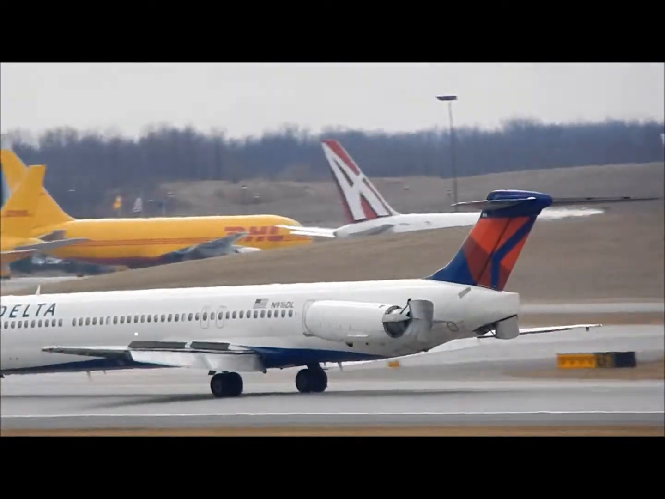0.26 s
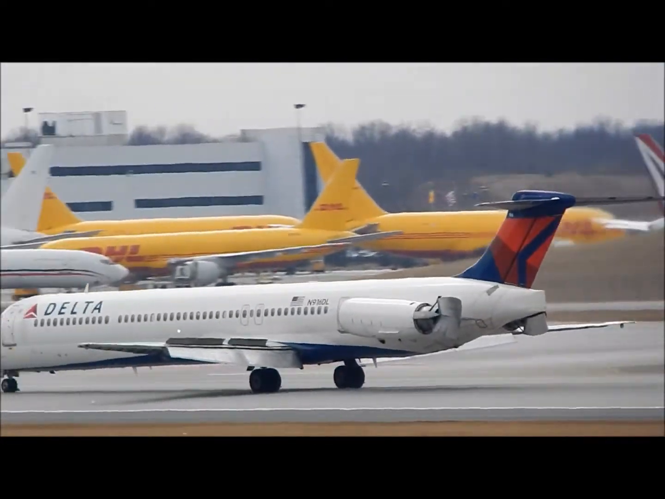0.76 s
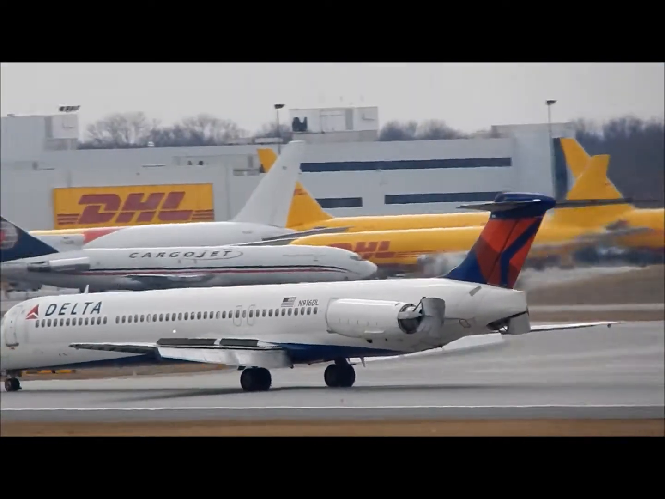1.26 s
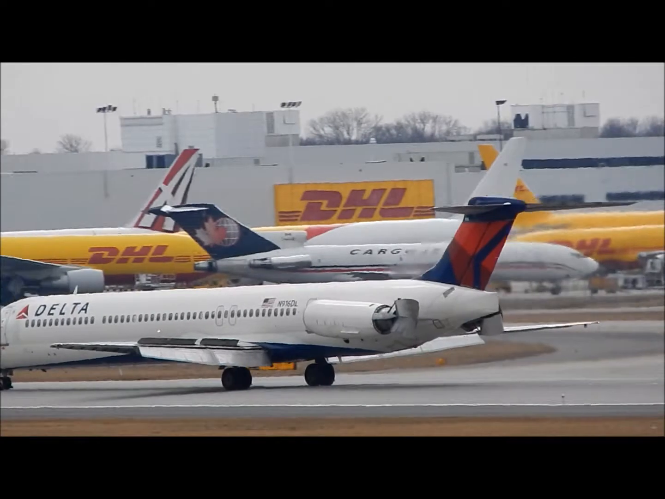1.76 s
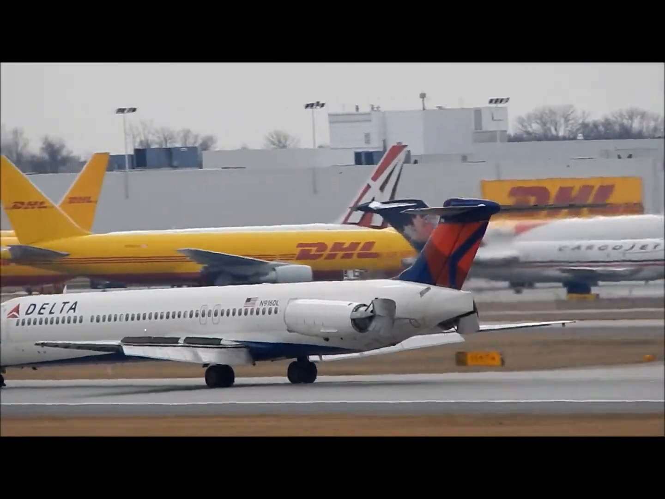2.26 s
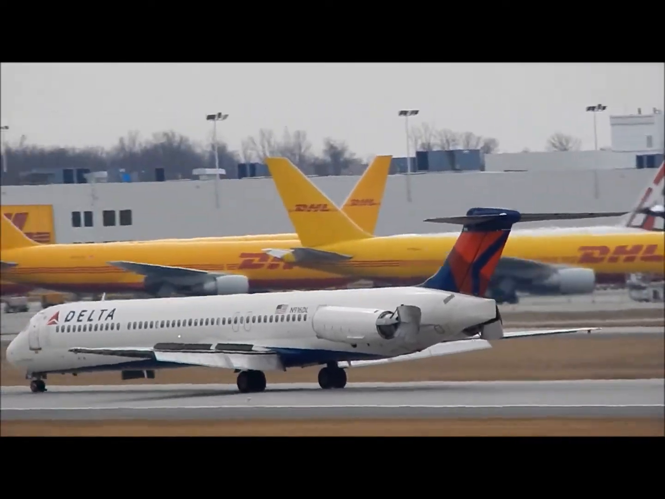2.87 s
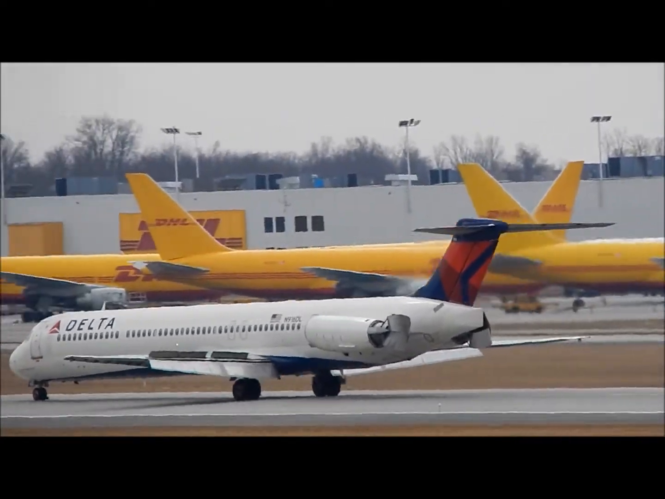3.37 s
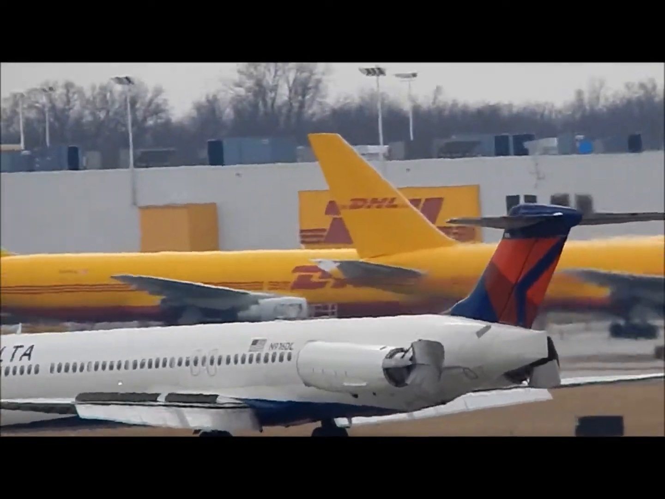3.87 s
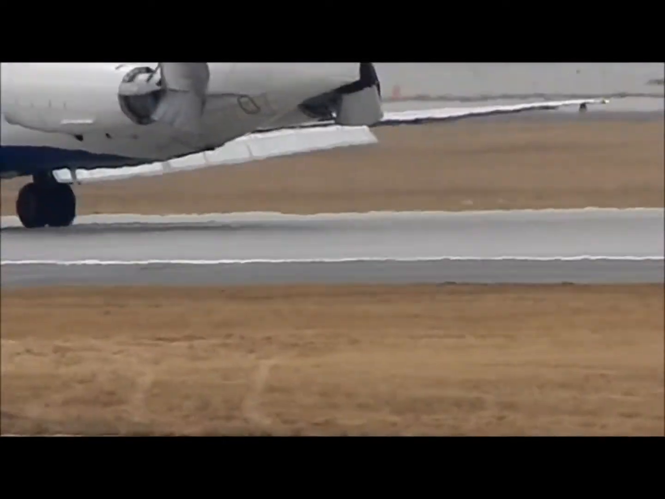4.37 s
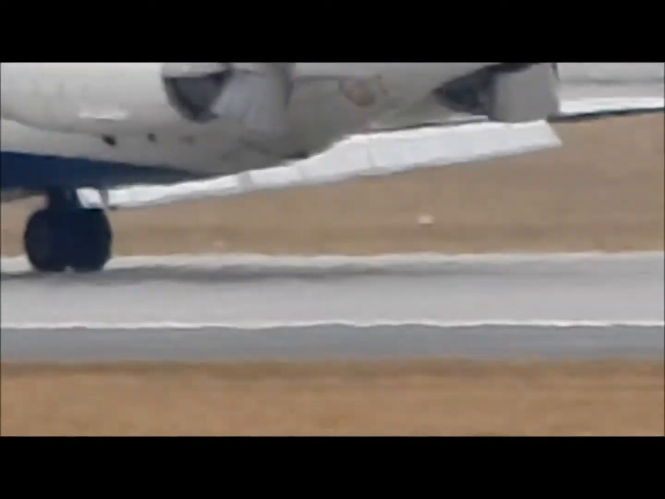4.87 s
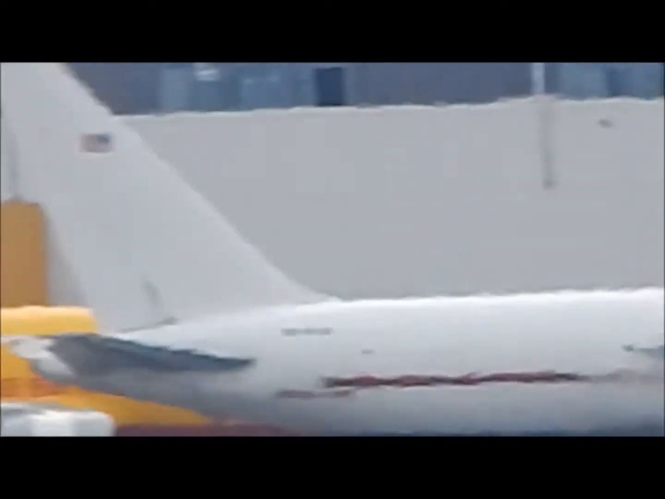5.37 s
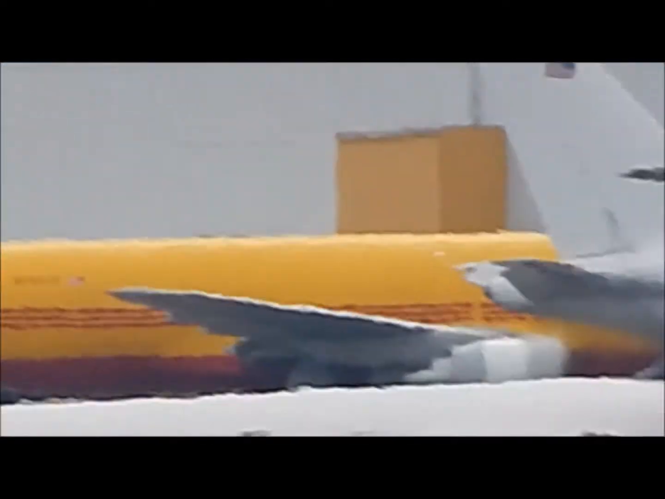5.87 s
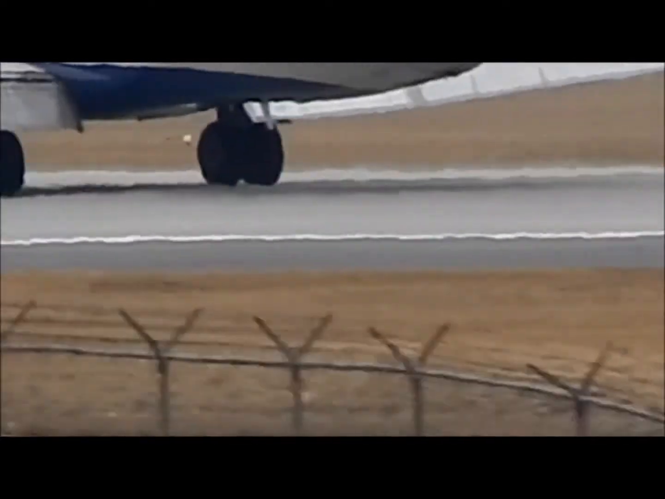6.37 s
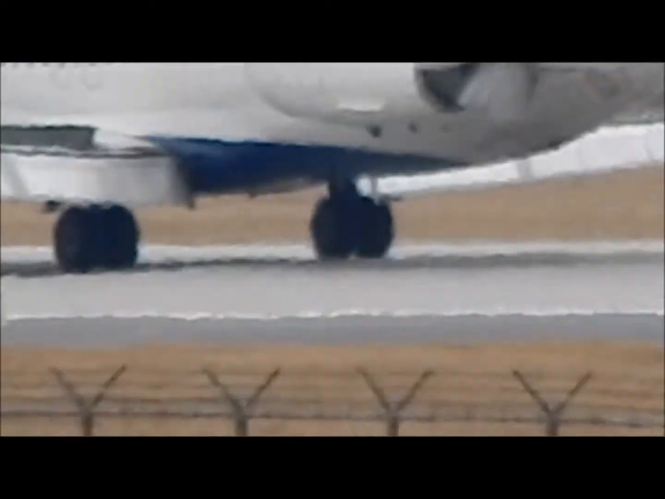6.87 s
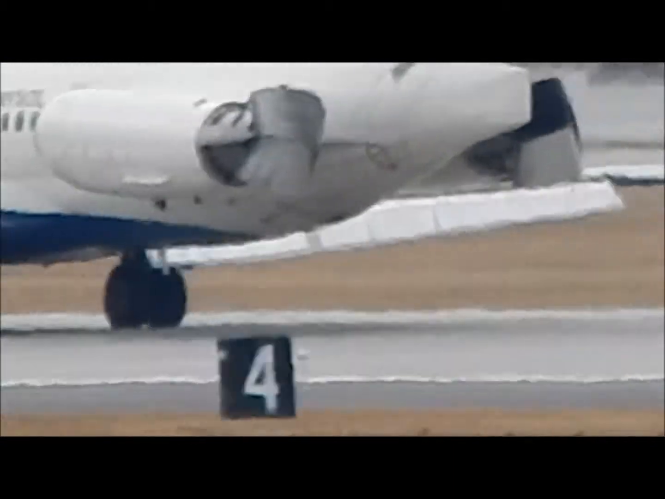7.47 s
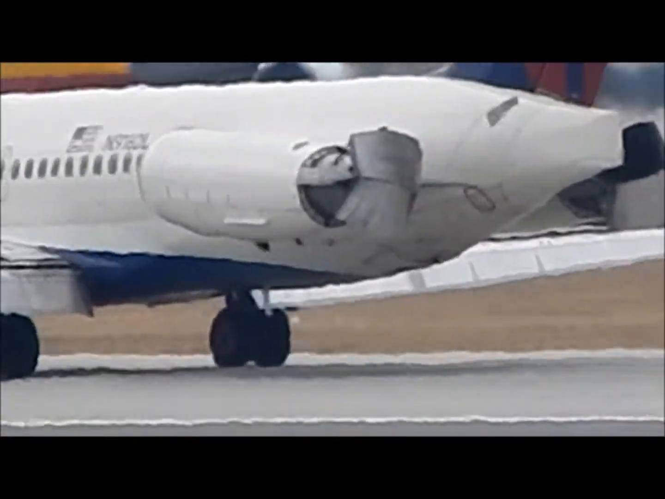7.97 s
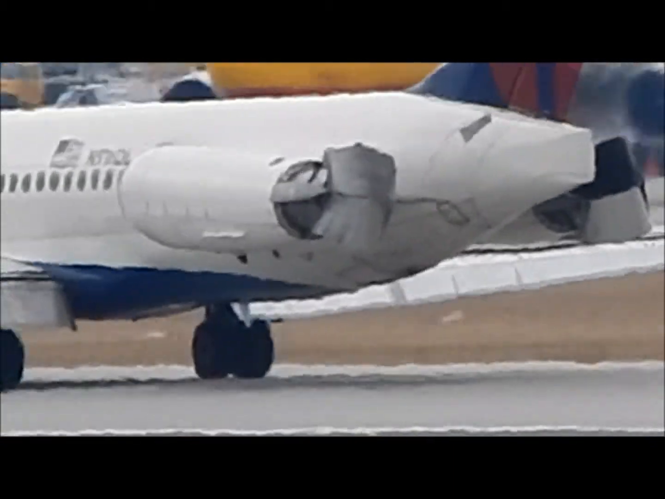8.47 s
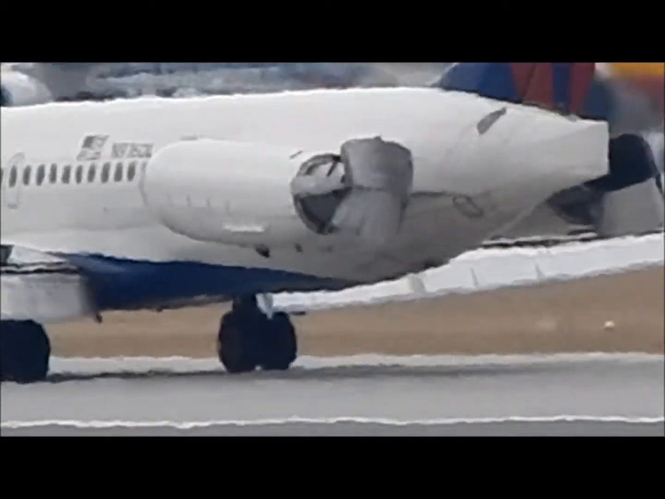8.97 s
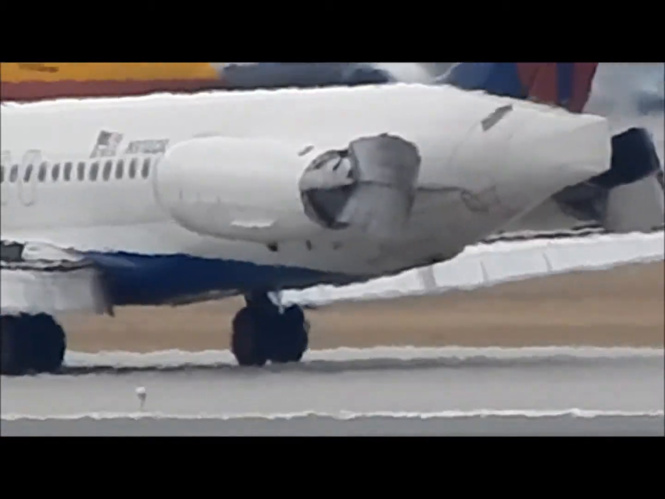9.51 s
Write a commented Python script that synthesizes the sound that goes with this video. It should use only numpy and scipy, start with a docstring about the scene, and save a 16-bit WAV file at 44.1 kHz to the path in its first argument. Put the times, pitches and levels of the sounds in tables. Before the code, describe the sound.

From the start, a twin rear-engined airliner rolls along a runway in reverse thrust, heard outdoors from beyond the fence. The roar is broad, low and continuous, with little treble and a slowly shifting hollow colour; it is strong for about 3 seconds, brightening near 1.2, then weaker from 3.3 to 5.3. Low wind thuds hit the microphone in abrupt, irregular bursts, densest until about 8.5, with hard buffets near 3.4 and 4.4 that make the level dip. Close, faint finger hiss and tiny ticks come and go. At 4.8 a scrape and sharp snap ring the camera case, slightly left, and the sound ducks for about half a second. The roar returns by 5.7 and holds. Breathy skin squeaks come around 7.1 to 7.3, a bright tick at 7.8. After 8.3 the engines fade, leaving weak rumble by 9.7, with little wind.

```python
"""An airliner with two rear engines rolls down a runway in reverse thrust, heard from beyond the fence.
Its roar is shaped noise in three bands, combed by a ground echo, dulled by air, fading as the engines spool down.
Gusts, abruptly gated low noise, buffet the microphone; hands on the camera rustle, squeak and tick in hiss bursts.
The gain control dips at the hardest gusts and ducks for half a second after one sharp click,
which is a noise crack with decaying case resonances."""
import sys
import numpy as np
from scipy import signal
from scipy.fft import rfft, irfft, next_fast_len
from scipy.io import wavfile
from scipy.ndimage import uniform_filter1d, minimum_filter1d, map_coordinates

SR = 44100
rng = np.random.default_rng(int(sys.argv[2]) if len(sys.argv) > 2 else 0)


def inscribe(sig):
    """Save sig as 16-bit PCM at rate SR to the path in sys.argv[1].

    A 1-D sig is mono; a 2-D sig holds one channel per row.
    Samples are clipped to [-1, 1] before scaling.
    """
    pcm = np.round(np.clip(np.atleast_2d(sig).T, -1, 1) * 32767)
    wavfile.write(sys.argv[1], SR, pcm.astype(np.int16))


N = 429521
TIME = np.arange(N) / SR
TOP_HZ = 15830  # upper band limit


def amp(db):
    """Level law: decibels to an amplitude ratio."""
    return 10 ** (np.asarray(db) / 20)


def unit(x):
    """Normalization: x at rms 1."""
    return x / np.sqrt(np.mean(x ** 2) + 1e-20)


def along(points, hz):
    """Logarithmic frequency scale: (Hz, value) points read between their knots."""
    f, v = np.transpose(points)
    return np.interp(np.log(hz + 1), np.log(f + 1), v)


def curves(rows):
    """Linear interpolation: one value per sample for each column after the time."""
    s, *columns = np.transpose(rows)
    return [np.interp(TIME, s, column) for column in columns]


def smooth(x, seconds):
    """Running mean of a positive quantity."""
    return np.abs(uniform_filter1d(x, max(1, int(seconds * SR))))


def wobble(rate):
    """Random modulation: a smooth curve through rate random knots a second."""
    knots = rng.standard_normal(int(N * rate / SR) + 4)
    return map_coordinates(knots, [TIME * rate])


def filtered(x, response):
    """Linear filtering: the spectrum of x times a response of frequency."""
    m = next_fast_len(N + 8192)
    hz = np.fft.rfftfreq(m, 1 / SR)
    return irfft(rfft(x, m) * response(hz), m)[..., :N]


def below(hz, edge_hz, order=10):
    """Low-pass gain, one half at the edge."""
    return 1 / (1 + (hz / edge_hz) ** order)


def panned(lr_db):
    """Interchannel level difference: gains that make left lr_db louder than right."""
    return amp(np.array([[lr_db], [-lr_db]]) / 2)


def rush(spectrum, alike):
    """Partial coherence: coloured stereo noise of rms 1, its channels correlated as alike tells."""
    def mid_and_side(hz):
        turn = np.arccos(np.clip(along(alike, hz), -1, 1)) / 2
        return amp(along(spectrum, hz)) * [np.cos(turn), np.sin(turn)]

    mid, side = filtered(rng.standard_normal((2, N)), mid_and_side)
    return unit(np.array([mid + side, mid - side]))


def add(track, s, sound):
    """Superposition: mix a short stereo sound in at time s."""
    part = track[:, round(s * SR):][:, :sound.shape[1]]
    part += sound[:, :part.shape[1]]


def tick(db, hz, decay_s):
    """Impulsive noise: a burst around hz under exponential decay, db rms at its peak."""
    t = TIME[:SR // 32]
    decay = np.exp(-t / decay_s)
    burst = decay * (rng.standard_normal(len(t)) + .5 * rng.standard_normal((2, len(t))))
    edges_hz = [hz * 2 / 3, min(hz * 3 / 2, TOP_HZ)]
    burst = signal.sosfilt(signal.butter(1, edges_hz, "band", fs=SR, output="sos"), burst)
    return amp(db) * unit(burst) * np.sqrt(np.mean(decay ** 2))


# Small ticks of the camera body.
# Each row: start in seconds, rms level at the peak in dB, left over right in dB, centre in Hz.
BODY_TICKS = [(0.8874, -46, 6, 9500), (0.8902, -44, 2, 3800), (0.9348, -49, 3, 8560),
              (1.0498, -43, -1, 3310), (1.3405, -43, 1.5, 3600), (1.5913, -46, 7, 9040),
              (1.8971, -46, 1.5, 8500), (3.1944, -41, -3, 5970), (3.204, -48, 3, 10900),
              (3.222, -50.5, 1, 9950), (3.7938, -51.5, 5, 9000), (3.8845, -51.5, 3, 10140),
              (4.0478, -45, 5.5, 9950), (4.6678, -44.5, 4, 9500), (4.7125, -38.5, 2.5, 6000),
              (7.295, -45, 1, 5020), (7.7675, -48, 5, 7930), (7.798, -35, 6, 12500),
              (7.882, -46.5, 4.5, 11000), (9.653, -48, -8, 3400)]


def ticks(decay_s=0.00095):
    """Sudden release of strain: the body gives under the fingers with sharp ticks, some dull, some bright."""
    sound = np.zeros((2, N))
    for s, db, lr_db, hz in BODY_TICKS:
        add(sound, s, tick(db, hz, decay_s) * panned(lr_db))
    return sound


# Skin catching on the case with a breathy squeak.
# Each row: centre in seconds, peak level in dB, half-width in seconds, pitch of the hiss in Hz.
SKIN_SQUEAKS = [(7.1, -65.5, 0.071, 5100), (7.12, -64, 0.08, 8300), (7.265, -58, 0.014, 4000),
                (8.125, -67.5, 0.022, 11200)]


def squeaks(width_hz=550):
    """Frictional noise through a resonance: a dragging fingertip makes a short swell of narrow hiss."""
    sound = np.zeros((2, N))
    for s, db, half_width_s, hz in SKIN_SQUEAKS:
        resonance = signal.iirpeak(hz, hz / width_hz, fs=SR)
        band = signal.lfilter(*resonance, rng.standard_normal((2, N)))
        sound += amp(db) * np.exp(-((TIME - s) / half_width_s) ** 2) * unit(band)
    return sound


# Spectrum of skin on the camera. Each row: frequency in Hz, relative density in dB per Hz.
SKIN_SPECTRUM = [(1000, -21.5), (3500, 7), (5500, 4), (7000, 1), (9000, 2.5), (11000, 4.5), (13500, -4),
                 (15800, -18)]
# Fingers sliding. Each row: centre in seconds, nominal hiss level in dB, half-width in seconds.
FINGER_SLIDES = [(.875, -59.5, 0.042), (1.3, -60.5, 0.11), (1.598, -57, 0.019), (2.95, -62.5, 0.44),
                 (3.188, -53, 0.025), (3.57, -61, .02), (3.87, -62, 0.074), (4.7, -56.5, 0.09),
                 (5.33, -67.5, 0.21), (7.3, -57.5, 0.033), (7.81, -55, 0.048), (8.1, -65.5, 0.79),
                 (9.5, -63, .04)]


def hands(rest_db=-66, grain_db=0.6, puff_db=-0.3, specks_per_s=16, speck_db=-3.02, speck_spread_db=4,
          speck_s=0.0023, sheen_db=-15, sheen_grows=1.5):
    """Sliding friction: a grainy hiss with tiny specks, louder and brighter whenever a finger slides."""
    # the resting hiss and overlapping slides add in power
    slide_power = np.ones(N)
    for s, db, half_width_s in FINGER_SLIDES:
        swell = np.exp(-((TIME - s) / half_width_s) ** 2)
        slide_power = slide_power + (amp(db - rest_db) * swell) ** 2
    slide = np.sqrt(slide_power)
    # specks fall at random, as in a Poisson process
    gaps, sizes = rng.exponential(size=(400, 2)).T
    at = np.minimum(np.cumsum(gaps) / specks_per_s * SR, N).astype(int)
    specks = np.bincount(at, amp(speck_db + speck_spread_db * np.minimum(sizes, 2)), N + 1)[:N]
    specks = smooth(specks, speck_s) * speck_s * SR
    grain = unit(amp(grain_db * wobble(210) + puff_db * wobble(25))) + specks
    hiss = slide * rush(SKIN_SPECTRUM, [(3000, 0.48), (12000, 0.089)])
    # the sheen grows faster than the slide, which brightens it
    bright = rush([(5000, -22.5), (12000, 0.5), (15000, -0.5), (17000, -39.0)], [(12000, .1)])
    sheen = amp(sheen_db) * slide ** sheen_grows * bright
    return amp(rest_db) * grain * panned(2) * (hiss + sheen)


# The click, a catch and then a snap. Each row: start in seconds, crack in dB, ring in dB, before panning.
CATCH_AND_SNAP = [(4.784, -21.5, -35), (4.7882, -15.5, -9)]
# Resonances of the camera case. Each row: frequency in Hz, relative level in dB, 60 dB decay in seconds.
CASE_MODES = [(2060, 0, .022), (2600, -10, .025), (3150, -13, .025), (3574, -19, .03), (4764, -27, .03),
              (5912, -28, .03), (7300, -21, .025), (8765, -24, .025)]
# Scrapes around the snap. Each row: centre in seconds, nominal level in dB, half-width in seconds.
PART_SCRAPES = [(4.776, -32, .010), (4.804, -26.5, .015)]


def click(chatter_db=-5, judder_db=1.5, crack_t60=.013):
    """Modal excitation: a part scrapes, catches and snaps home by the right port, ringing the case."""
    t = TIME[:SR // 8]
    ring = sum(amp(db - 60 * t / t60) * np.sin(2 * np.pi * hz * t) for hz, db, t60 in CASE_MODES)
    scrape = sum(amp(db) * np.exp(-((TIME - s) / width) ** 2) for s, db, width in PART_SCRAPES)
    force = scrape * unit(amp(judder_db * wobble(500)))
    # the scrape drives the same resonances with noise
    chatter = signal.fftconvolve(force * rng.standard_normal(N), ring / np.linalg.norm(ring))[:N]
    case = np.tile(amp(chatter_db) * chatter, (2, 1))
    force = np.tile(force, (2, 1))
    for s, crack_db, ring_db in CATCH_AND_SNAP:
        add(case, s, amp(ring_db) * ring[None])
        add(force, s, amp(crack_db - 60 * t / crack_t60)[None])
    crack = rush([(800, -28.0), (2100, 11.0), (3000, 2), (4500, -3.5), (7500, -0.5), (11000, -1),
                  (13500, -3.5), (15800, -28)], [(3000, 0.25), (12000, 0.023)])
    return case * panned(-9) + force * crack * panned(-6.5)


# Gusts that overload the microphone.
# Each row: start in seconds, peak pressure push in dB, tick in dB, tick centre in Hz.
OVERLOADING_GUSTS = [(.224, -4, -35, 2200), (.4685, -4.5, -36.5, 2400), (2.3164, -5, -35.5, 1800),
                     (3.3552, -3, -26, 650), (4.4164, -2.5, -34, 2000), (6.4097, -3, -35, 2100)]


def slams(decay_s=.0008, crest_s=.015, half_width_s=.035):
    """Overload: the hardest gusts give a dull tick and a slow push of pressure, too low to hear."""
    sound = np.zeros((2, N))
    for s, push_db, tick_db, tick_hz in OVERLOADING_GUSTS:
        sound += amp(push_db) * np.exp(-((TIME - s - crest_s) / half_width_s) ** 2)
        add(sound, s, tick(tick_db, tick_hz, decay_s))
    return sound


# Spectrum of wind on the microphone. Each row: frequency in Hz, relative density in dB per Hz.
WIND_SPECTRUM = [(15, -35), (30, -23.5), (50, -15), (70, -4.5), (90, 2.5), (120, 0), (150, -11.5),
                 (200, -24.5), (270, -36.5), (500, -54), (1000, -78.5)]
# Gusts and short puffs. Each row: start in seconds, end in seconds, nominal level in dB.
GUST_SPANS = [(0.003, 0.121, -17.5), (0.176, 0.286, -15.0), (0.345, 0.429, -17.5), (0.47, 0.49, -13),
              (0.534, 0.562, -18), (0.567, 0.624, -19.5), (0.689, 0.726, -12), (0.796, 0.812, -14),
              (0.85, 0.949, -16), (0.958, 1.008, -16), (1.308, 1.33, -16.5), (1.371, 1.392, -19.5),
              (1.429, 1.517, -17), (1.517, 1.629, -13), (1.727, 1.775, -17.5), (1.812, 2.222, -15),
              (2.246, 2.44, -15.5), (2.48, 2.523, -20.0), (2.559, 2.591, -17), (2.839, 2.923, -15.5),
              (3.009, 3.047, -17), (3.075, 3.184, -16), (3.266, 3.292, -19.5), (3.312, 3.376, -11),
              (3.392, 3.444, -14.5), (3.463, 3.503, -13), (3.518, 3.558, -14.5), (3.581, 3.603, -16),
              (3.629, 3.655, -18.5), (3.676, 3.761, -10.5), (3.803, 3.995, -13.5), (3.991, 4.14, -16.5),
              (4.141, 4.269, -12), (4.273, 4.364, -19.5), (4.366, 4.441, -7.5), (4.439, 4.803, -16.5),
              (4.8, 4.86, -18.5), (4.886, 5.107, -16.5), (5.173, 5.23, -15.5), (5.274, 5.36, -14.5),
              (5.384, 5.435, -17), (5.449, 5.587, -16.5), (5.599, 5.68, -19.0), (5.695, 5.764, -18),
              (5.777, 5.849, -18.5), (5.876, 5.973, -12), (6.002, 6.08, -13.5), (6.076, 6.385, -18),
              (6.374, 6.465, -13.5), (6.551, 6.723, -19.5), (6.781, 6.879, -17), (6.956, 6.983, -14),
              (7.024, 7.062, -19), (7.164, 7.424, -16), (7.431, 7.629, -19), (7.692, 7.998, -18),
              (8.017, 8.051, -17.5), (8.068, 8.29, -20.5), (8.298, 8.336, -19.5), (8.358, 8.473, -17.5),
              (8.561, 8.6, -20), (8.997, 9.012, -18), (9.086, 9.116, -16.5)]


def wind(edge_s=.007, evenness=0.8, lump_db=1.47, eddy_db=1.0, breeze_db=-39, low_cut_hz=24, stall_db=-4):
    """Turbulent pressure: gusts thud low on the microphone, abruptly on and off, over a light breeze."""
    force = np.full(N, amp(breeze_db))
    for start, end, db in GUST_SPANS:
        force[(TIME >= start) & (TIME <= end)] = amp(db)
    air = rush(WIND_SPECTRUM, [(25, .3), (60, 0.79), (100, 0.99), (200, 0.77)])
    # within a gust the pressure nearly keeps its strength, apart from passing eddies and quick lumps
    air = air / (smooth(np.mean(air ** 2, axis=0), 0.034) + 1e-6) ** (evenness / 2)
    air = unit(air * amp(eddy_db * wobble(16) + lump_db * wobble(55)))
    thuds = smooth(force, edge_s) * air
    # the strongest eddies level off
    strength = np.sqrt(2 * smooth(np.mean(thuds ** 2, axis=0), 0.01))
    thuds = thuds / (1 + (strength / amp(stall_db)) ** 4) ** (1 / 4)
    return filtered(thuds, lambda hz: 1 - below(hz, low_cut_hz, order=2))


# The ground echo along the roll.
# Each row: time in seconds, second cancellation in Hz, echo share of the direct sound before scattering.
GROUND_ECHO = [(0, 1147, 0.18), (1, 1125, 0.72), (3.2, 1005, 0.3), (5.2, 1002, 0.25), (6.198, 1077, .72),
               (8.001, 948, 0.71), (9.699, 920, 0.47)]


def over_ground(x, rough_hz=2100, air_db=0.89, patchy_db=1.2):
    """Interference and absorption: the ground echo cuts a sliding comb; the air dulls and makes patchy."""
    hz, s, z = signal.stft(x, SR, nperseg=1024)
    hz = hz[:, None]
    times, notch_hz, echo = np.transpose(GROUND_ECHO)
    # grass turns the echo by a third of a cycle, so the first notch lies at a quarter of the second
    cycles = (4 * hz / np.interp(s, times, notch_hz) - 1) / 3
    # uneven ground scatters the short waves
    echo = np.interp(s, times, echo) * np.exp(-(hz / rough_hz) ** 2)
    comb = np.abs(1 - echo * np.exp(2j * np.pi * cycles)) / np.hypot(1, echo)
    # each second of rolling puts more air in the way: air_db more loss at 3 kHz
    loss_db = air_db * (s - s.mean()) * np.minimum(hz / 3000, 2) ** 2
    eddies = uniform_filter1d(rng.standard_normal(z.shape[1:]), size=8, axis=0)
    eddies = uniform_filter1d(eddies, size=9, axis=1)
    gain = comb * amp(patchy_db * unit(eddies) - loss_db)
    return signal.istft(z * gain, SR, nperseg=1024)[1][:, :N]


# The course of the roar.
# Each row: time in seconds, nominal level in dB, brightness (relative middle over large eddies) in dB.
ROAR_COURSE = [(0.0, -18, -5), (0.45, -17.5, -3.5), (0.8, -17, -1.5), (1.05, -17, -1.5), (1.2, -16, 6.5),
               (1.65, -16, 0.5), (1.8, -18.0, -2), (2.1, -19, -4.5), (2.4, -19.5, -6), (2.6, -18, -1),
               (2.95, -16.5, -3.5), (3.3, -20.5, 1), (3.6, -23, -6), (3.9, -22, -2), (4.05, -23, -0.5),
               (4.35, -21, -5.5), (4.5, -21, 1.5), (4.8, -22, 0.5), (4.9, -22.5, -1), (5.09, -26, -6.5),
               (5.35, -23.5, -6), (5.69, -18.5, 0.5), (6.29, -19.5, 0), (6.44, -19.5, -6),
               (6.74, -19.0, -4), (6.89, -20.5, 1.5), (7.04, -19.5, 0), (7.34, -19.5, 1.5),
               (7.49, -22.5, -5.5), (7.79, -20.0, -0.5), (8.24, -19, 1), (8.54, -24.5, -2),
               (8.84, -24.5, -2.5), (8.99, -26, -2), (9.44, -28.5, -5), (9.74, -32.5, 2.5)]
# Roar at the camera: low-heavy noise with fixed dips, falling steeply above 3.5 kHz.
# Each row: frequency in Hz, relative density in dB per Hz.
ROAR_SPECTRUM = [(25, -37), (60, -18.5), (110, -6), (170, -7), (270, -16), (350, 1), (450, 1.5), (700, -8),
                 (1400, -11), (1900, -19.5), (2300, -21), (2800, -34.5), (3200, -37), (3550, -44.5),
                 (3800, -52), (8000, -100)]
# The jet at the two microphone ports. Each row: frequency in Hz, left-right correlation (no unit).
PORT_LIKENESS = [(100, 0.8), (500, 1), (950, 0.97), (1600, 0.96), (2800, 0.78)]


def jet(rumble_db=-4.0, roar_db=-6.5, rasp_db=-8.0, rumble_yields=0.53, rasp_follows=0.86, swell_db=0.8,
        surge_db=.5, flutter_db=0.42, lag_s=4e-5):
    """Jet mixing noise: exhaust thrown forward by the reversers, its large, middle and small eddies on one level."""
    noise = over_ground(rush(ROAR_SPECTRUM, PORT_LIKENESS))
    low = filtered(noise, lambda hz: below(hz, 634))
    high = filtered(noise, lambda hz: 1 - below(hz, 896))
    middle = noise - low - high
    level, bright = curves(ROAR_COURSE)
    rumble = level + rumble_db - rumble_yields * bright
    roar = level + roar_db + (1 - rumble_yields) * bright
    rasp = level.mean() + rasp_db + rasp_follows * (level - level.mean())
    # each band also swells by chance
    bands = [(rumble, low), (roar, middle), (rasp, high)]
    sound = sum(amp(db + swell_db * wobble(5.3)) * unit(band) for db, band in bands)
    # the sound reaches the right port first, by lag_s
    ports = np.array([[-1], [1]])
    sound = filtered(sound, lambda hz: np.exp(np.pi * 1j * hz * lag_s * ports))
    # moving air on the way makes the whole roar surge and flutter
    return sound * amp(surge_db * wobble(12) + flutter_db * wobble(24))


def scene():
    """Superposition: the distant jet, with wind and handling at the camera."""
    return jet() + wind() + slams() + hands() + squeaks() + ticks() + click()


# slow pressure above this level turns the gain down
OVERLOAD_DB, OVERLOAD_HZ = -6, 25
# lag of the gain, lag of its extra treble cut, longest stay at the bottom after a hard peak
ATTACK_S, TREBLE_LAG_S, HOLD_S = .005, .03, .13


def gain_control(x, threshold_db=-13, slope=0.53, depth_db=9.5, recovery_db_per_s=25.5, stand_out=4,
                 treble_share=.45):
    """Level compression: a sharp peak or a wind push cuts the gain, treble most; both climb back steadily."""
    heard = x * signal.windows.tukey(N, .01)

    def power(lo_hz, hi_hz):
        band = filtered(heard, lambda hz: below(hz, hi_hz, order=20) - below(hz, lo_hz, order=20))
        return np.mean(band ** 2, axis=0)

    edge = power(4200, 7000)
    roar = minimum_filter1d(smooth(power(1800, 3300), .1), SR // 4)
    # only a peak well above its own surroundings counts as sudden
    sudden = np.maximum(smooth(edge, 0.0038) - stand_out * smooth(edge, 0.058), 1e-14)
    # room beyond the depth becomes the hold
    cut_db = slope * (10 * np.log10(sudden / roar) - threshold_db)
    cut_db = np.clip(cut_db, 0, depth_db + HOLD_S * recovery_db_per_s)
    pressure = np.abs(filtered(x.mean(axis=0), lambda hz: below(hz, OVERLOAD_HZ)))
    cut_db = np.maximum(cut_db, 20 * np.log10(pressure + 1e-9) - OVERLOAD_DB)
    # a straight climb in dB after each cut
    climb = TIME * recovery_db_per_s
    cut_db = np.minimum(np.maximum.accumulate(cut_db + climb) - climb, depth_db)

    def lagged(seconds):
        step = 1 / (seconds * SR)
        return signal.lfilter([step], [1, step - 1], cut_db)

    body = filtered(x, lambda hz: below(hz, 3500))
    treble = (x - body) * amp(-treble_share * lagged(TREBLE_LAG_S))
    return (body + treble) * amp(-lagged(ATTACK_S))


def record(dry):
    """Band limiting: the camera rides its gain, dips one narrow notch and cuts the lowest and highest tones."""
    notch_hz, half_width_hz, depth, bottom_hz = 2500, 30, .8, 22

    def response(hz):
        notch = 1 - depth / (1 + 1j * (hz - notch_hz) / half_width_hz)
        return notch * (1 - below(hz, bottom_hz)) * (hz < TOP_HZ)

    return filtered(gain_control(dry), response)


dry = scene()
out = record(dry)
inscribe(out)
```